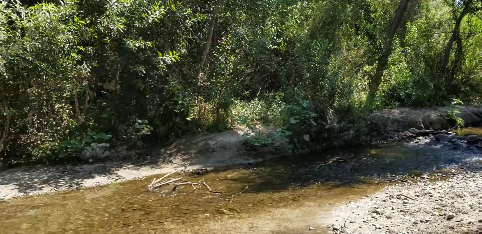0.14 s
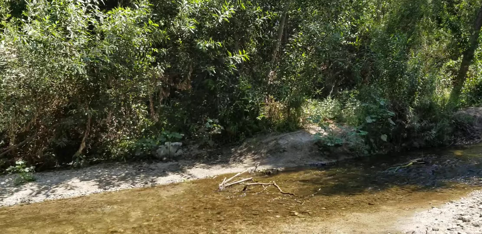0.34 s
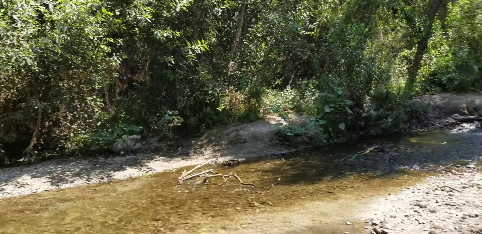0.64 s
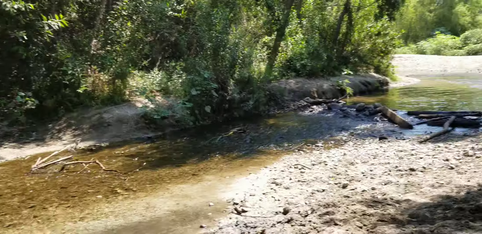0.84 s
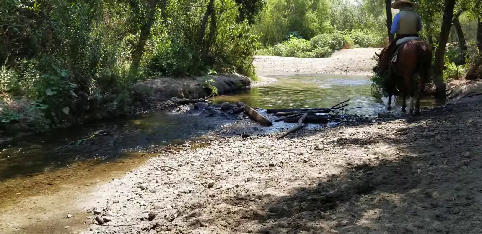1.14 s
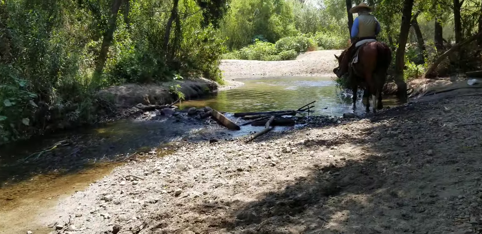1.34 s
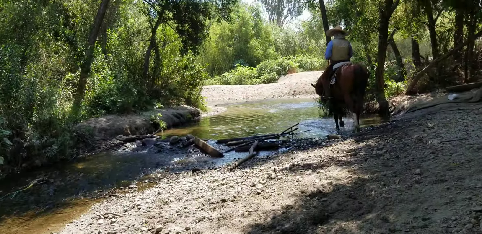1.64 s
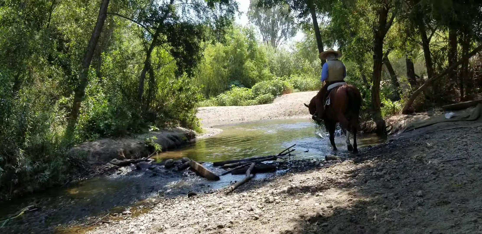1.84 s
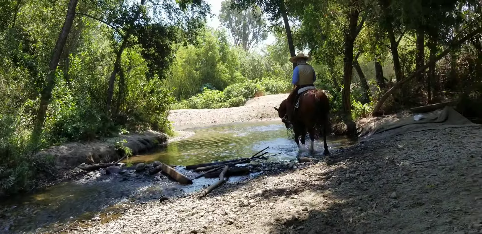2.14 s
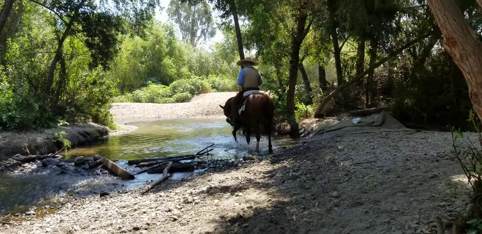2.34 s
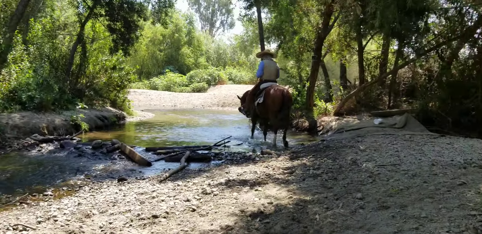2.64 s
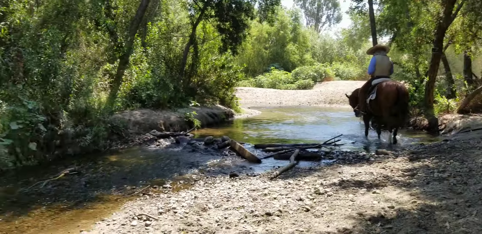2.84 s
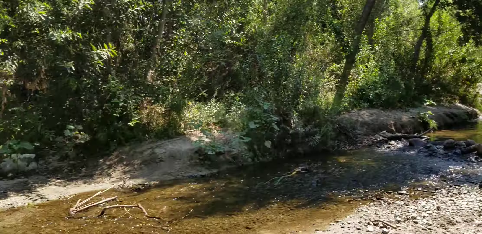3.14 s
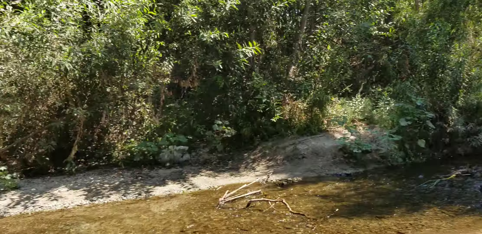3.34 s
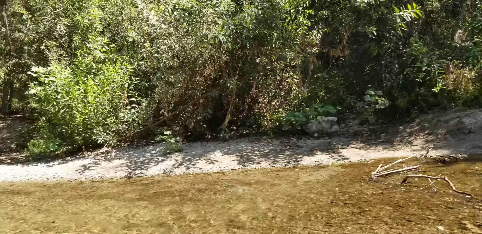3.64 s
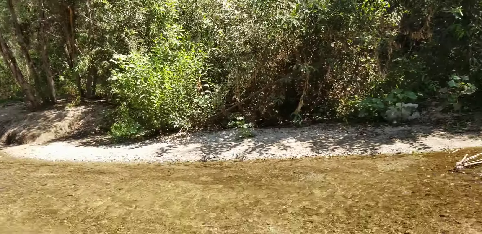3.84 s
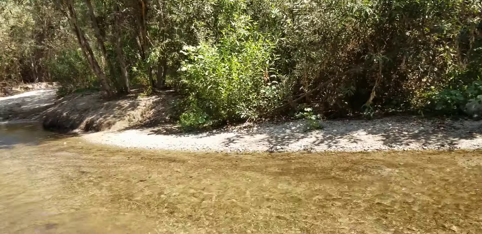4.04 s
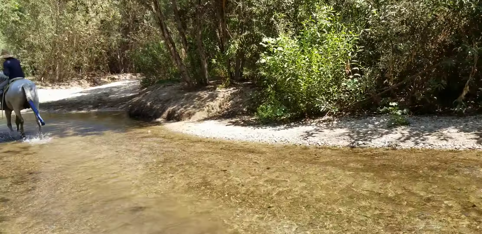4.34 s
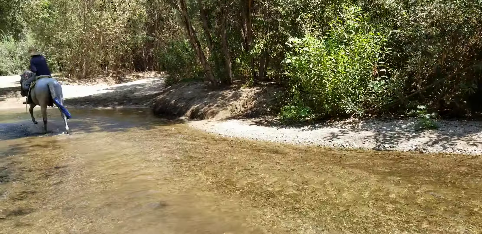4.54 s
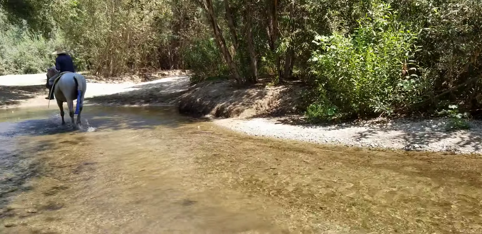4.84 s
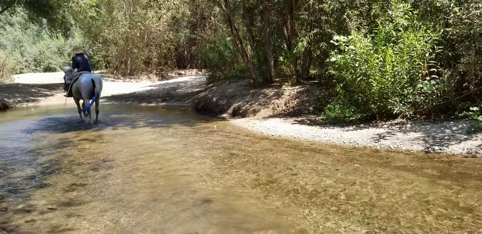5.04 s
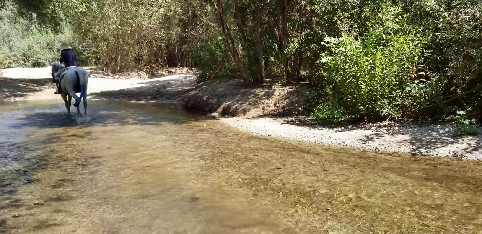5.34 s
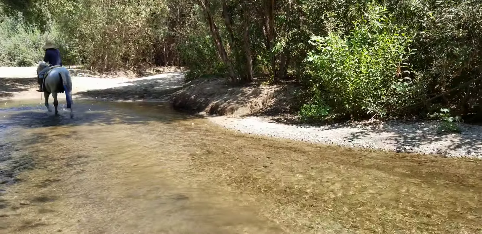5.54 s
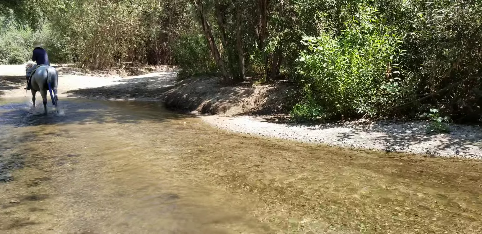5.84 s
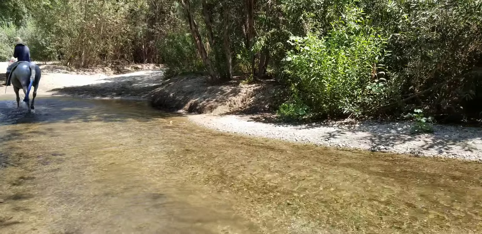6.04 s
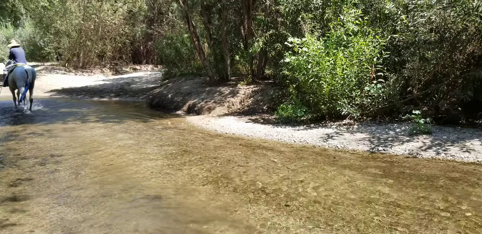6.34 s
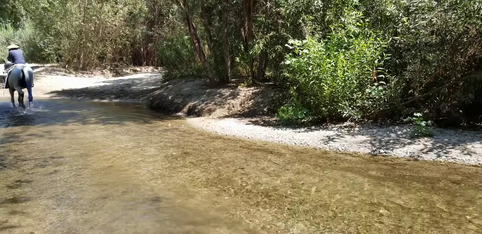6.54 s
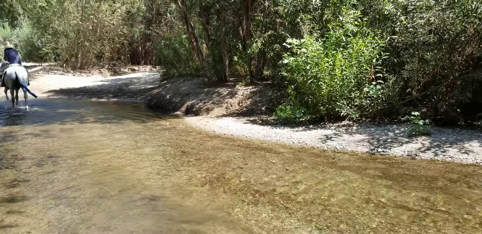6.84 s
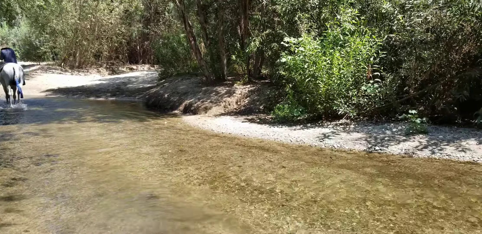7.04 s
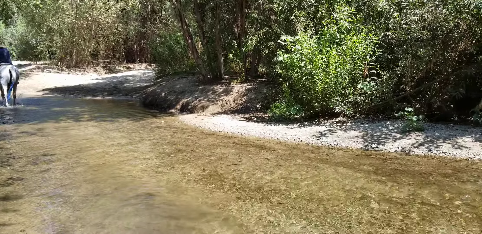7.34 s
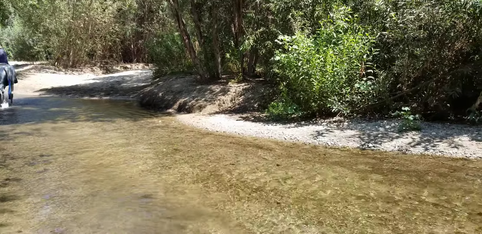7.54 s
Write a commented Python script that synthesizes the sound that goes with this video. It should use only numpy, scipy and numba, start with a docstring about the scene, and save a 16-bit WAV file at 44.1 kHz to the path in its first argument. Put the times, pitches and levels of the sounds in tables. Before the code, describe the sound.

Two horses wade through a shallow stony creek for nearly eight seconds, heard from between them. Water gurgles and splashes throughout, swelling with each uneven stride, while hooves make hollow plops several times a second and occasionally knock loose stones. For the first three seconds the wading is mostly on the left and splashy, with brief fizzing froth and bursts of spray around 0.4, 1.7 and 2.5 seconds, then again just after 3. One sharp stone clack stands out at about 2.3 seconds. Between 3 and 4.5 seconds the sloshing shifts to the second horse on the right, with deeper, rounder plops near 4.5, 5.3 and 5.7 and a cluster from 6 to 7.2 seconds. A few drops tick close by around 1.2 and 6.5 seconds. The banks give the plops and knocks a short echo, and a faint, distant low rumble continues underneath.

```python
"""Water gurgles and splashes over a far rumble as two horses wade a shallow stony creek.
The bay and the grey, one upstream and one downstream, are heard from a third mount through a phone
that turns from one to the other. Each stride swells a swarm of ringing bubbles and drops. Hooves plop
as air pockets close behind them, leave froth fizzing, knock loose stones and throw sheets of spray.
A few drops tick close by, and the banks return a short echo of the hits and the froth."""
import sys
import numpy as np
from scipy import signal
from scipy.fft import rfft, irfft
from scipy.io import wavfile
from scipy.ndimage import map_coordinates
from numba import njit

SR = 44100
rng = np.random.default_rng(int(sys.argv[2]) if len(sys.argv) > 2 else 0)


def int16_out(signal):
    """Quantize to a 16-bit WAV file."""
    q = np.round(np.clip(np.atleast_2d(signal).T, -1, 1) * 32767)
    wavfile.write(sys.argv[1], SR, q.astype(np.int16))


N = 339570


def undb(db):
    """Decibels to gain."""
    return 10 ** (np.asarray(db) / 20)


def eq_db(curve, hz, column=1):
    """An EQ curve read on a log-frequency axis."""
    points = np.array(curve, float)
    return np.interp(np.log(np.maximum(hz, 1)), np.log(points[:, 0]), points[:, column])


def automation(table, s):
    """The lanes of an automation table at times s."""
    t, *lanes = np.transpose(table)
    return [np.interp(s, t, lane) for lane in lanes]


@njit
def ring(n, start, lag, omega, fade, rise, glide, left, right):
    """Damped sines with a soft onset and a pitch glide; the left channel is offset by lag samples."""
    out = np.zeros((2, n + 200))
    for k in range(len(start)):
        phasor, soft = 1 + 0j, 1.
        step = np.exp(1j * omega[k] - fade[k])
        bend = np.exp(1j * omega[k] * glide[k] * fade[k] / 7)
        at_left, at_right = start[k] + 50 + lag[k], start[k] + 50
        for i in range(min(int(5 / fade[k]), n - start[k])):
            phasor, step, soft = phasor * step, step * bend, soft * rise[k]
            out[0, at_left + i] += left[k] * (1 - soft) * phasor.imag
            out[1, at_right + i] += right[k] * (1 - soft) * phasor.imag
    return out[:, 50:n + 50]


def grains(s, db, hz, t60, bearing, glide, attack_cycles):
    """Panned pings whose pitch bends by the share glide over t60; the far port is later and shaded."""
    port_gap_ms, shade_db = .47, 1.5
    hz, side = np.clip(hz, 20, .45 * SR), np.sin(np.radians(bearing))
    s, db, hz, t60, side, glide = np.broadcast_arrays(s, db, hz, t60, side, glide)
    lag = np.round(side * port_gap_ms * SR / 1000).astype(int)
    fade = np.log(1000) / (np.maximum(t60, 1e-4) * SR)
    rise = np.exp(-hz / (attack_cycles * SR))
    left, right = undb(db - shade_db * side / 2), undb(db + shade_db * side / 2)
    return ring(N, (s * SR).astype(int), lag, 2 * np.pi * hz / SR, fade, rise, 1. * glide, left, right)


# Pan automation as the phone turns: t/s, bearing of the bay/deg, the grey's share of the stirred water
PHONE_TURN = [(0, -58.5, 0.061), (3.2, -77.5, 0.19), (4.4, -23.5, 0.76), (6.3, -28, 1), (7.7, -28, 0.81)]
GREY_DEG, MOUNT_DEG, WAKE_WIDTH_DEG = 71, 6, 24


def hoof_bearing(s, horse):
    """Pan in degrees at times s for horse 0 (the bay), 1 (the grey) or 2 (the mount under the phone)."""
    bay = 0.87 * automation(PHONE_TURN, s)[0]  # its hooves lie nearer the middle than its wake
    return np.choose(np.rint(horse).astype(int), [bay, GREY_DEG, MOUNT_DEG])


def swarm(colour, count, cycles, scatter_db, off_banks, patchy_db):
    """A unit-RMS bed of bubbles or drops; some come off the banks, the rest from the bay or the grey."""
    when, pitch, stray, pan, size, length, horse = rng.random((count, 7)).T
    s = when * N / SR
    low_hz, high_hz = colour[0][0], colour[-1][0]
    hz = low_hz * (high_hz / low_hz) ** pitch
    bay_deg, grey_share = automation(PHONE_TURN, s)
    wake = np.where(horse < grey_share, GREY_DEG, bay_deg + WAKE_WIDTH_DEG * (pan - .5))
    loose = stray < off_banks * (hz / low_hz) ** .5  # finer drops fly wider
    bearing = np.where(loose, 360 * pan, wake)
    # the colour shifts nine times a second
    patches = map_coordinates(rng.standard_normal((200, 9)), [9 * s, 8 * pitch], order=1)
    # high grains are shorter and spread thinner, so their size rises with pitch
    db = eq_db(colour, hz) + 20 * np.log10(hz) - scatter_db * np.log(size) + patchy_db * patches
    bed = grains(s, db, hz, cycles * (.5 + length) / hz, bearing, glide=0.31, attack_cycles=0.51)
    return bed / np.sqrt(np.mean(bed ** 2))


# The water between strides: t/s, gurgle level/dB, splash level/dB, spray level/dB
CALM_WATER = [(0, -36, -34.5, -40), (1, -41, -44, -45), (1.9, -71, -42.5, -49.5), (2.6, -46.5, -42, -46),
              (3.102, -52, -43, -47.5), (3.4, -43, -42, -54), (4, -47.5, -43, -55.5),
              (4.801, -45.5, -41, -50.5), (5.5, -45, -41, -50.5), (6.1, -44, -39, -50.5),
              (7, -44.5, -41, -52), (7.7, -45, -42.5, -53.5)]
# A leg drags through the water: t/s of the fullest swell, gurgle level/dB, splash level/dB, spray level/dB
LEG_DRAGS = [(.08, -47, -52, -54), (.2, -47, -60, -47), (.32, -42, -36.5, -47), (.45, -49, -41.5, -54),
             (.6, -44, -36, -48.5), (.8, -47, -38, -47), (.91, -39, -39, -53), (1.01, -48.5, -36.5, -41),
             (1.19, -39, -37, -43.5), (1.36, -42, -42, -45), (1.46, -38.5, -42, -59),
             (1.61, -46, -39.5, -52), (1.75, -39, -46, -62), (1.89, -39, -53, -51),
             (2.032, -43, -43, -49.5), (2.17, -40.5, -39.5, -44), (2.28, -36.5, -34.5, -55),
             (2.47, -40.5, -42, -44), (2.76, -39.5, -43, -48), (3.03, -43, -41.5, -48),
             (3.11, -42, -44, -52), (3.24, -61, -41, -48), (3.6, -41, -40.5, -49), (3.85, -47.5, -47, -51),
             (4.16, -46, -40.5, -52.5), (4.4, -44.5, -43.5, -54), (4.55, -37.5, -42, -65),
             (4.76, -42, -60, -63), (4.93, -43, -40.5, -56), (5.06, -50, -44, -63),
             (5.27, -39.5, -39.5, -52), (5.67, -36.5, -41, -68), (5.97, -42.5, -47, -57),
             (6.135, -37.5, -44, -48), (6.375, -37, -45, -51), (6.55, -45, -61, -65),
             (6.75, -43.5, -40.5, -49), (6.85, -39, -48, -62), (7.09, -38, -57, -64),
             (7.165, -40.5, -54, -60), (7.24, -40, -42.5, -54), (7.39, -36.5, -46, -62),
             (7.66, -42, -48, -58)]


def stride_envelopes():
    """Gains of gurgle, splash and spray: each stride swells over the calm water, then ebbs more slowly."""
    swell_s, ebb_s = 0.05, 0.062
    s, *peaks = np.transpose(LEG_DRAGS)
    t = np.arange(N) / SR
    after = t - s[:, None]
    swell = np.exp(-(after / np.where(after < 0, swell_s, ebb_s)) ** 2)
    floors = automation(CALM_WATER, t)
    return [np.sqrt(undb(peak) ** 2 @ swell + undb(floor) ** 2) for peak, floor in zip(peaks, floors)]


# Spectra of the low gurgle, the mid splash and the fine spray: f/Hz, relative level/dB
GURGLE_EQ = [(110, -6), (170, 0.5), (250, 1.5), (450, 2), (800, -4), (1200, -35)]
SPLASH_EQ = [(700, 1.5), (1200, 6.5), (2200, 3.5), (3200, -4.5), (5000, -9), (7500, -4)]
SPRAY_EQ = [(6500, 9), (9000, -1), (12000, -7), (16000, -2.5)]


def wading_water():
    """Legs stir three beds of bubbles and drops; thrown sheets of spray lift the upper two."""
    gurgle = swarm(GURGLE_EQ, count=9000, cycles=12.2, scatter_db=1.56, off_banks=0.14, patchy_db=2.0)
    splash = swarm(SPLASH_EQ, count=100000, cycles=14.6, scatter_db=1.55, off_banks=0.24, patchy_db=1.5)
    spray = swarm(SPRAY_EQ, count=80000, cycles=18.0, scatter_db=-2.0, off_banks=0.73, patchy_db=2.5)
    gurgle_gain, splash_gain, spray_gain = stride_envelopes()
    sheets = sheet_envelope()
    splash_gain = splash_gain + 0.49 * sheets
    spray_gain = spatter() * spray_gain + 0.41 * sheets
    return gurgle_gain * gurgle + splash_gain * splash + spray_gain * spray


def spatter(depth_db=2, rate_hz=40):
    """A fluttering gain: the falling drops come in quick uneven showers."""
    flutter = np.interp(np.arange(N) / SR * rate_hz, np.arange(400), rng.standard_normal(400))
    return undb(depth_db * flutter)


# Spectrum of the far rumble: f/Hz, relative level/dB
RUMBLE_EQ = [(20, -23), (35, -1), (65, 4.5), (110, -2.5), (200, -14), (400, -19), (900, -34.5)]


def rumble(level_db=-46, width=.27):
    """Low noise from far along the valley, nearly alike at both ports."""
    hz = np.arange(N // 2 + 1) * SR / N
    mid, side = (rfft(rng.standard_normal(N)) for _ in range(2))
    stereo = mid + width * side * np.array([[1], [-1]])
    out = irfft(undb(eq_db(RUMBLE_EQ, hz)) * stereo, N)
    return out / np.sqrt(np.mean(out ** 2)) * undb(level_db)


# Air pockets closing behind a hoof: t/s, level/dB, f/Hz, t60/s, swell/cycles, horse
AIR_POCKETS = [(0.06, -27, 516, 0.12, 0.52, 0), (0.085, -15, 473, 0.039, 0.44, 0),
               (0.156, -22, 169, 0.11, 0.52, 0), (0.31, -17, 742, 0.15, 0.5, 0),
               (0.331, -9, 747, 0.024, 0.2, 0), (0.377, -22.5, 242, 0.064, 0.32, 0),
               (0.436, -20, 480, 0.026, 1, 0), (0.469, -19, 970, 0.016, 0.76, 0),
               (0.575, -19.5, 818, 0.047, 2.06, 0), (0.619, -12, 990, 0.012, 0.78, 0),
               (0.651, -10, 343, 0.054, 1.83, 0), (0.675, -24, 268, 0.13, 0.69, 0),
               (0.785, -22.5, 436, 0.03, 0.56, 0), (0.893, -28, 250, 0.066, 0.86, 0),
               (0.902, -7, 945, 0.02, 3.6, 0), (1.107, -30, 240, 0.057, .4, 2),
               (1.111, -18, 936, 0.022, 1.4, 2), (1.15, -21.5, 195, 0.053, 0.83, 0),
               (1.195, -21, 500, 0.023, 0.53, 0), (1.307, -19.5, 251, 0.048, .4, 2),
               (1.428, -22, 1010, 0.02, .4, 0), (1.448, -22.5, 633, 0.036, 0.25, 0),
               (1.59, -26.5, 255, 0.038, 0.44, 2), (1.606, -19.5, 1090, 0.016, 0.35, 2),
               (1.741, -6.5, 825, 0.023, 2.2, 0), (1.739, -16.5, 470, 0.04, 1.5, 0),
               (1.875, -30, 322, 0.046, 0.96, 0), (1.896, -17.5, 507, 0.032, 1.14, 0),
               (2.047, -20.5, 413, 0.019, 0.42, 0), (2.205, -17.5, 450, 0.042, 0.78, 2),
               (2.206, -21.5, 1015, 0.029, 0.73, 2), (2.23, -17.5, 440, 0.0414, 0.64, 2),
               (2.256, -14.5, 565, 0.056, 0.57, 0), (2.292, -14, 695, 0.013, 0.43, 0),
               (2.6645, -17, 350, 0.028, 0.37, 2), (2.74, -22, 950, 0.017, 1.05, 2),
               (2.784, -26, 292, 0.038, 0.3, 0), (2.919, -26.5, 533, 0.023, 0.4, 0),
               (3.04, -15, 825, 0.013, 0.64, 0), (3.059, -12, 850, 0.018, 1.46, 1),
               (3.127, -21, 690, 0.02, 0.44, 0), (3.341, -19, 496, 0.026, 0.47, 0),
               (3.412, -20, 352, 0.066, 0.63, 0), (3.532, -19.5, 374, 0.033, 0.42, 1),
               (3.598, -18.5, 576, 0.047, 0.33, 0), (3.921, -20, 500, 0.023, 0.61, 0),
               (4.149, -26, 440, 0.03, 0.29, 1), (4.498, -13, 422, 0.048, 3.5, 0),
               (4.518, -7.5, 279, 0.032, 1.34, 1), (4.556, -14.5, 320, 0.06, 2.4, 1),
               (4.736, -22, 353, 0.046, 1.37, 0), (4.932, -14.5, 390, 0.03, 1.34, 1),
               (5.058, -15.5, 950, 0.016, 1.65, 0), (5.066, -25.5, 442, 0.084, 0.42, 0),
               (5.178, -16, 244, 0.032, 0.67, 0), (5.259, -16.5, 310, 0.054, 0.5, 1),
               (5.291, -11, 404, 0.019, 1.53, 1), (5.643, -22, 547, 0.021, .4, 0),
               (5.679, -11, 280, 0.0707, 2.17, 1), (5.8925, -8.5, 670, 0.016, 0.99, 0),
               (5.904, -23.5, 300, 0.062, 0.45, 0), (6.079, -14.5, 431, 0.036, 0.49, 1),
               (6.082, -20.5, 231, 0.081, 0.6, 1), (6.126, -16.5, 266, 0.048, 0.56, 1),
               (6.162, -18.5, 330, 0.037, 0.39, 1), (6.183, -19, 650, 0.036, 2.6, 0),
               (6.232, -22, 427, 0.032, 0.29, 0), (6.242, -17, 503, 0.033, 1.37, 0),
               (6.374, -14, 265, 0.034, 1.2, 1), (6.408, -13, 249, 0.07, 0.6, 1),
               (6.63, -23, 360, 0.032, 0.44, 0), (6.719, -19, 205, 0.19, 0.32, 1),
               (6.772, -16, 294, 0.036, 1.77, 1), (6.797, -25.5, 522, 0.057, 1.5, 0),
               (6.847, -25.5, 460, 0.03, 0.49, 0), (7.073, -15.5, 350, 0.073, 1.57, 0),
               (7.088, -21.5, 263, 0.076, 1.2, 1), (7.13, -23, 370, 0.065, 2.7, 1),
               (7.177, -22, 177, 0.068, 0.47, 1), (7.225, -27, 266, 0.13, 1.47, 1),
               (7.367, -28.5, 797, 0.082, .4, 0), (7.651, -24.5, 326, 0.029, 0.36, 1)]


def hoof_plops():
    """Each pocket rings and sags in pitch as it deepens; the slap that opens it scatters short bubbles."""
    thump_db, bubble_db = -10, -14
    s, db, hz, t60, swell, horse = np.transpose(AIR_POCKETS)
    bearing = hoof_bearing(s, horse)
    out = grains(s - swell / hz, db, hz, t60, bearing, glide=-0.238, attack_cycles=np.maximum(swell, .05))
    db = db - 2 * swell  # a slow swell never reaches its full size
    # the dull push of the hoof itself
    out += grains(s, db + thump_db, 0.49 * hz, 5.2 / hz, bearing, glide=0, attack_cycles=0.49)
    for delay, pitch in rng.random((len(s), 8, 2)).transpose(1, 2, 0):
        bubble_hz = hz * 2 ** (2.97 * pitch - .9)
        out += grains(s + .3 * t60 * delay, db + bubble_db - 2.9 * pitch, bubble_hz, 11.4 / bubble_hz,
                      bearing, glide=0.58, attack_cycles=0.058)
    return out


# Froth left fizzing where a hoof went in: t/s, level/dB, f/Hz, t60/s of the patch, horse
FROTH_PATCHES = [(0.199, -42, 2530, 0.53, 0), (0.791, -51, 4200, .4, 0), (.995, -49, 4230, .3, 0),
                 (1.001, -40.5, 1870, 1.06, 0), (1.36, -42.5, 1960, 0.41, 0), (4.44, -47.5, 1230, 0.78, 0),
                 (4.598, -50, 4500, 0.58, 0), (5.895, -43.5, 4060, 1.5, 0), (6.7, -49, 4750, .7, 1)]


def froth(bubbles=500, spread_octaves=0.13, cycles=30):
    """Each patch of bubbles, all of about one size, starts at once and thins away."""
    s, db, hz, t60, horse = np.transpose(FROTH_PATCHES)[..., None]
    delay, size, pan = rng.random((len(s), 3, bubbles)).transpose(1, 0, 2)
    wait = .4 * t60 * delay
    bubble_hz = (hz * 2 ** (spread_octaves * rng.standard_normal(wait.shape))).ravel()
    bubble_db = db - 60 * wait / t60 - 2.54 * np.log(size)
    bearing = hoof_bearing(s, horse) + WAKE_WIDTH_DEG * (pan - .5)
    return grains((s + wait).ravel(), bubble_db.ravel(), bubble_hz, cycles / bubble_hz,
                  bearing.ravel(), glide=0.33, attack_cycles=0.56)


# Hoof on stone: t/s, level/dB, f/Hz, muffling by water/(dB per octave), horse
STONE_HITS = [(0.308, -32, 1380, -1.5, 0), (0.331, -25.5, 2160, 13, 0), (0.898, -26.5, 1430, 9, 0),
              (1.1492, -29, 1720, 9.5, 0), (1.189, -26, 1420, 16, 0), (1.432, -30.5, 1870, 11, 0),
              (1.606, -30.5, 1950, 8.5, 2), (1.741, -30, 1500, 8.5, 0), (1.922, -35, 1730, 10, 0),
              (1.9967, -29, 1770, 8, 0), (2.2533, -13.5, 1766, 0, 0), (2.3631, -28.5, 1630, 24.5, 0),
              (2.472, -33.5, 4230, 7, 0), (2.665, -33.5, 4700, -1.5, 2), (3.3376, -27, 1530, 24.5, 0),
              (4.4564, -36, 1300, 9, 0), (4.5092, -33.5, 2200, 13.5, 1), (5.0546, -31.5, 1320, 4, 0),
              (5.3297, -30, 1570, 9, 0), (5.603, -35, 1350, 2, 0), (5.891, -39, 3800, 1.5, 0),
              (6.2064, -33.5, 1480, 13, 0)]
# Modes of a loose stone: ratio to the hit's pitch, relative level/dB
STONE_MODES = [(0.361, -6.5), (1, 0.5), (1.12, -6), (1.5, -6.5), (1.94, 8), (2.9, -7), (4.001, 13)]


def stone_knocks(crack_t60=0.0096, ring_cycles=27):
    """The blow and two quick, duller rebounds ring the modes of a loose stone."""
    s, db, hz, muffle, horse = np.transpose(STONE_HITS)
    bearing = hoof_bearing(s, horse)
    out = np.zeros((2, N))
    # the first contact cracks across the treble; under water it is a longer, duller crunch
    crunch_s = 0.0014 + .00018 * np.abs(muffle)
    for delay, pitch in rng.random((len(s), 7, 2)).transpose(1, 2, 0):
        crack_db, crack_hz = db - 1 - 1.1 * muffle * pitch, hz * 0.966 * 2.02 ** pitch
        out += grains(s + crunch_s * delay, crack_db, crack_hz, crack_t60, bearing,
                      glide=0, attack_cycles=0.065)
    for wait_s, bounce_db, dull_db_per_octave in [(0, 6, 10), (.0045, 4, 43), (.0095, 1.5, 14)]:
        for ratio, mode_db in STONE_MODES:
            detune = 1 + .035 * rng.standard_normal(len(s))
            ring_db = db + mode_db + bounce_db - (dull_db_per_octave + muffle) * max(np.log2(ratio), 0)
            t60 = ring_cycles / hz / ratio ** 0.67
            out += grains(s + wait_s, ring_db, hz * ratio * detune, t60, bearing,
                          glide=0, attack_cycles=0.34)
    return out


# Sheets of spray thrown up as a leg breaks the surface: t/s, level/dB
SPRAY_SHEETS = [(0.3331, -43), (0.408, -36), (0.4863, -38), (1.6057, -41), (1.727, -32.5), (2.252, -33),
                (2.46, -28.5), (2.6638, -44), (3.02, -42), (3.102, -40), (3.2261, -41), (4.5096, -41),
                (4.734, -38), (5.89, -43)]


def sheet_envelope(attack_s=0.00037, t60=0.14):
    """Gain of the thrown spray: a sharp attack, then a tail as it rains back."""
    s, db = np.transpose(SPRAY_SHEETS)
    after = np.maximum(np.arange(N) / SR - s[:, None], 0)
    return np.sum(undb(db[:, None] - 60 * after / t60) * (1 - np.exp(-after / attack_s)), axis=0)


# Single drops landing close to the phone: t/s, level/dB
CLOSE_DROPS = [(1.223, -39), (1.295, -39), (4.739, -40), (6.4934, -37), (6.5895, -40), (6.6185, -39),
               (6.6235, -42)]


def drop_ticks():
    """A landing drop clicks: three very short pings across the treble."""
    s, db = np.transpose(CLOSE_DROPS)
    return sum(grains(s, db + tone_db, hz, t60=0.0021, bearing=-40, glide=0, attack_cycles=0.18)
               for hz, tone_db in [(5600., -8), (7600., 19.0), (10500., 0)])


def bank_echo(send, level_db=-7.5, t60=0.17, predelay_s=.006):
    """Short scattered echo from the banks and trees: mono in the bass, wide above."""
    t = np.arange(int(.4 * SR)) / SR
    mid, side = rng.standard_normal((2, len(t))) * undb(-60 * t / t60) * (t > predelay_s)
    side = signal.sosfilt(signal.butter(2, 500, "high", fs=SR, output="sos"), side)
    tail = np.array([mid + side, mid - side]) / np.sqrt(2 * np.sum(mid ** 2))
    return undb(level_db) * signal.fftconvolve(send, tail, axes=1)[:, :N]


def scene():
    """Hits and froth with their echo, over the wading water and the rumble."""
    hits = hoof_plops() + froth() + stone_knocks() + drop_ticks()
    return wading_water() + hits + bank_echo(hits) + rumble()


# Colour of the phone's two microphone ports: f/Hz, left level/dB, right level/dB
PORT_EQ = [(50, -4.5, -4), (152, -4, -1), (770, -0.5, -0.5), (1130, -0.5, 4), (1710, -4.5, -2),
           (2470, -4, -1), (3600, 1, 4.5), (5730, 1.5, 5.5), (6950, -4.5, -10), (8600, -7.5, -18),
           (11400, 4.5, -2), (12500, 8.5, 0), (14300, 4, 0.5), (15400, 4, -11)]


def record(dry, low_cut_hz=35, high_cut_hz=15900):
    """Each port has its own colour; the deepest bass and the top are cut."""
    hz = np.arange(N // 2 + 1) * SR / N
    port_gains = undb([eq_db(PORT_EQ, hz, column=1), eq_db(PORT_EQ, hz, column=2)])
    coloured = irfft(rfft(dry) * port_gains, N)
    coloured = signal.sosfilt(signal.butter(2, low_cut_hz, "high", fs=SR, output="sos"), coloured)
    return signal.sosfilt(signal.ellip(10, .2, 70, high_cut_hz, fs=SR, output="sos"), coloured)


dry = scene()
out = record(dry)
int16_out(out)
```